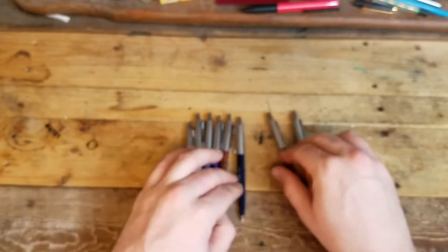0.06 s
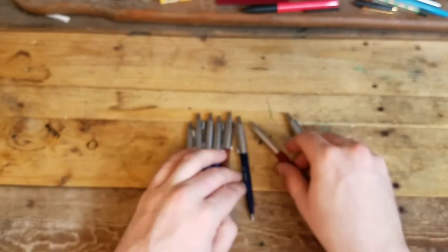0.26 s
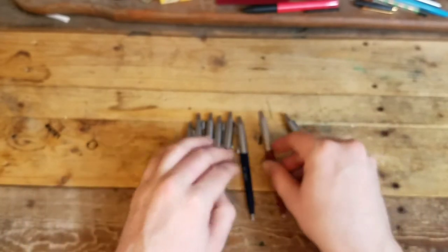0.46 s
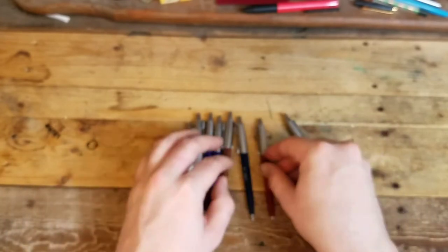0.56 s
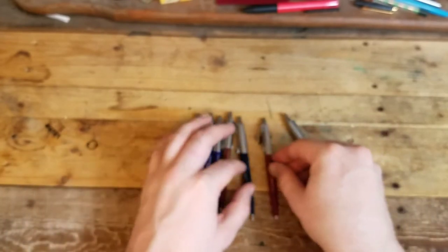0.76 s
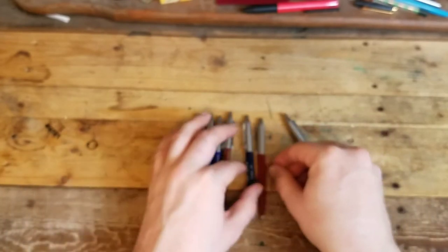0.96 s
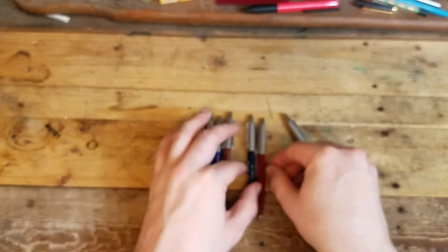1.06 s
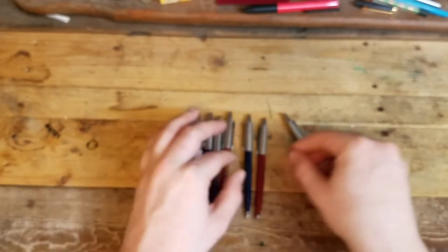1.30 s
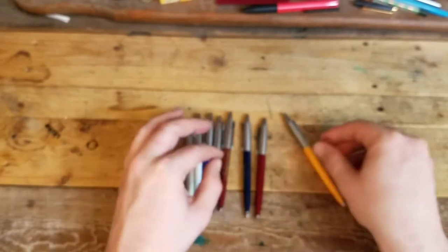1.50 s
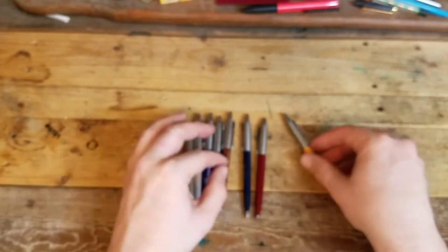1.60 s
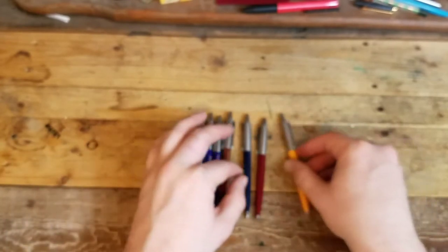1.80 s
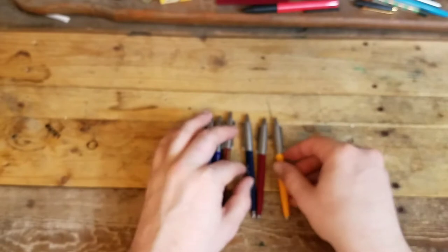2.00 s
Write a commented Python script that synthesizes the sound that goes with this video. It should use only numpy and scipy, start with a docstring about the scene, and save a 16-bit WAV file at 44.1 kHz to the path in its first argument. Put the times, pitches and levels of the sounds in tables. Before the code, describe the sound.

Ballpoint pens are sorted by hand on a wooden table, heard close in a small room. Light taps and a soft slide lead to one sharp knock, then a brief clatter and a few fainter ticks.

```python
"""Light taps and ticks of ballpoint pens, sorted by hand on a wooden table in a small room.
Each impact excites the damped modes of boards and barrel; one pen drops with a sharp knock.
Clips and caps click against each other, and sliding barrels rustle by stick-slip friction.
A low hum and a faint hiss lie underneath."""
import sys
import numpy as np
from scipy import signal
from scipy.io import wavfile

SR = 44100
rng = np.random.default_rng(int(sys.argv[2]) if len(sys.argv) > 2 else 0)


def inscribe(sig):
    """Save sig as 16-bit PCM at rate SR to the path in sys.argv[1].

    A 1-D sig is mono; a 2-D sig holds one channel per row.
    Samples are clipped to [-1, 1] before scaling.
    """
    pcm = np.round(np.clip(np.atleast_2d(sig).T, -1, 1) * 32767)
    wavfile.write(sys.argv[1], SR, pcm.astype(np.int16))


N = 90404
RING_S, BUILD_CYCLES = 0.35, 0.77  # a resonance builds over its cycle, so the lows arrive late
BAND_EDGES_HZ = 25 * 2 ** np.arange(0, 9.6, .5)
BAND_CENTRES_HZ = np.sqrt(BAND_EDGES_HZ[1:] * BAND_EDGES_HZ[:-1])
WOOD_PAN_DB, CLIP_PAN_DB, RUB_PAN_DB = -1.9, -3.4, -0.5

# Impacts of a pen on the table: (time [s], level [dB], contact cutoff [Hz], thud [dB])
PEN_IMPACTS = [(0.057, -52, 1380, 18.5), (0.087, -41, 1190, -10.5), (0.119, -58, 1620, 3),
               (0.188, -41.5, 2520, 8.5), (0.2004, -35, 2310, -1.5), (0.297, -52.5, 1290, 12),
               (0.351, -57, 1900, 25.5), (0.4294, -21.5, 4460, 1.5), (0.9157, -36, 2540, 2),
               (0.939, -45, 1230, 18.5), (0.9900, -32, 2360, -13.5), (0.9990, -37.5, 1410, -10),
               (1.04, -48, 1090, 8), (1.260, -46.5, 2330, 14), (1.2828, -43, 1480, 6.5),
               (1.547, -57, 1250, 14.5), (1.662, -49, 1520, 1), (1.685, -47.5, 1410, 7),
               (1.762, -48, 1470, 9), (1.783, -48.5, 1360, 10), (1.900, -44.5, 1720, 3.5)]
# Modes of the tabletop with a pen on it: (frequency [Hz], level [dB], T60 [s])
TABLETOP_MODES = [(157.3, -18.5, 0.31), (214.4, -24, 0.23), (296, -3.5, 0.072), (447, -13.5, 0.18),
                  (553.2, -10.5, 0.17), (762.7, -10.5, 0.15), (1041, -10, 0.086), (1147.3, -10, 0.18),
                  (1575, -3.5, 0.066), (1997, -11.5, 0.044), (2325, -6.5, 0.12), (2563, -8, 0.12),
                  (4640, 2.5, 0.025)]
# Modes of a hollow barrel against the wood: (frequency [Hz], level [dB], T60 [s])
HOLLOW_BARREL_MODES = [(781, -13.5, 0.079), (902, -16.5, 0.1), (1314, -17.5, 0.079)]
# Dense resonances of boards and barrels: (frequency [Hz], half-octave level [dB])
WOOD_SPECTRUM = [(110, -63), (200, -17.5), (300, -18), (450, -19.5), (800, -6), (1200, -8.5), (1900, -4.5),
                 (2800, -2.5), (4200, -10.5), (15000, -15)]
def pen_taps():
    """Impact excitation: a blow rings tabletop and barrel; soft contact cuts treble, weight adds thud."""
    times, level_db, cutoff_hz, thud_db = np.transpose(PEN_IMPACTS)
    thud_hz, rolloff_order = 360, 8.6

    def blow(hz):
        """Force spectrum of each impact: a bass shelf and a steep low-pass."""
        shelf_db = thud_db / (1 + (hz / thud_hz) ** 2)
        return from_db(level_db + shelf_db) / np.hypot(1, (hz / cutoff_hz) ** rolloff_order)
    boards = dense_modes(WOOD_SPECTRUM, blow, rise_s=np.full(len(times), 98e-6), t60=0.038, room_db=-5.5)
    boards += ringing(TABLETOP_MODES, blow)
    # A loosely held pen thuds less and rings more, decibel for decibel.
    barrel = ringing(HOLLOW_BARREL_MODES, lambda hz: blow(hz) * from_db(-thud_db))
    return pan(WOOD_PAN_DB) * placed(times, boards - barrel)


# Collisions between pens: (time [s], level [dB], contact cutoff [Hz], rise time [s])
CLIP_CONTACTS = [(0.036, -55.5, 10100, 0.0026), (0.057, -52.5, 12000, 0.00033),
                 (0.188, -44.5, 24000, 0.00031), (0.297, -52, 9300, 0.006), (0.3491, -45.5, 5700, 0.00036),
                 (0.392, -44.5, 5660, 0.00035), (0.4293, -29, 8800, 0.00025), (0.935, -35, 12000, 0.0074),
                 (1.001, -49, 8040, 0.00034), (1.02, -57, 8000, .0005), (1.0431, -43, 11100, 0.0038),
                 (1.723, -45.5, 5770, 0.0047), (1.899, -54.5, 7000, 0.0027)]
# Dense resonances of clips and caps: (frequency [Hz], half-octave level [dB])
CLIP_SPECTRUM = [(500, -26.5), (1500, -17), (2800, -17), (4200, -14), (6500, -14.5), (9000, -11),
                 (12000, -3), (15500, -4.5)]
# Modes of a metal cap: (frequency [Hz], level [dB], T60 [s])
METAL_CAP_MODES = [(2410, 0.5, 0.022), (4240, -10.5, 0.031), (4970, -7.5, 0.053)]
def clip_ticks():
    """Free vibration of small parts: clips and caps click; the duller the touch, the more a cap rings."""
    times, level_db, cutoff_hz, rise_s = np.transpose(CLIP_CONTACTS)
    gain = from_db(level_db)
    reference_cutoff_hz = 4930
    clicks = dense_modes(CLIP_SPECTRUM, lambda hz: gain / np.hypot(1, (hz / cutoff_hz) ** 2),
                         rise_s, t60=0.063, room_db=-3)
    caps = ringing(METAL_CAP_MODES, lambda hz: gain * (reference_cutoff_hz / cutoff_hz) ** 2)
    return pan(CLIP_PAN_DB) * placed(times, clicks + caps)


# Pushes of a pen over the wood: (centre time [s], half-width [s], rub level [dB], rustle level [dB])
SLIDE_STROKES = [(0.005, 0.013, -48.5, -69), (0.14, 0.16, -55, -73.5), (0.409, 0.03, -55.5, -77),
                 (0.632, 0.021, -95, -69.5), (0.929, 0.035, -44, -65.5), (1.002, 0.041, -55, -61.5),
                 (1.55, 0.32, -63, -82.5), (1.698, 0.049, -55, -72), (1.81, 0.046, -57, -79),
                 (2.052, 0.044, -49, -73)]
# Friction of barrel on wood: (frequency [Hz], half-octave level [dB])
RUB_SPECTRUM = [(110, -26), (280, -2.5), (450, -13), (800, -6.5), (1200, -8), (2400, -20), (4000, -29.5),
                (9000, -47)]
# Friction of barrel on barrel: (frequency [Hz], half-octave level [dB])
RUSTLE_SPECTRUM = [(1500, -69), (2500, -6), (5000, -6.5), (7000, -5), (13000, -2.5)]
def pen_slides():
    """Stick-slip friction: tiny random slips excite the wood, the neighbouring barrels and a cap."""
    t = np.arange(N) / SR
    centre_s, half_width_s, rub_db, rustle_db = np.transpose(SLIDE_STROKES)
    strokes = np.exp(-((t - centre_s[:, None]) / half_width_s[:, None]) ** 2)
    slips_per_s, scatter_db, cap_db = 2200, 3, -14
    slips = (rng.random(N) < slips_per_s / SR) * from_db(scatter_db * rng.standard_normal(N))
    friction = slips * rng.standard_normal((2, 2, N)) + 1e-18
    cap_hz, _, cap_t60 = METAL_CAP_MODES[0]
    radius = decay(1 / SR, cap_t60)
    resonator = [1, -2 * radius * np.cos(2 * np.pi * cap_hz / SR), radius * radius]
    cap = signal.lfilter([1, 0, -1], resonator, friction[0])
    rub = coloured(RUB_SPECTRUM, friction) + from_db(cap_db) * cap / cap.std()
    rustle = coloured(RUSTLE_SPECTRUM, friction)
    return (pan(RUB_PAN_DB) * (from_db(rub_db) @ strokes) * rub
            + pan(CLIP_PAN_DB) * (from_db(rustle_db) @ strokes) * rustle)


def ringing(modes, excitation):
    """Modal superposition: damped sines of alternating sign, out of step between left and right."""
    t, out = np.arange(int(RING_S * SR)) / SR, 0
    for k, (hz, level_db, t60) in enumerate(modes):
        spread_rad = 0.83 * (1 - at_hz(STEREO_COHERENCE, hz))
        phase = spread_rad * rng.choice([-1, 1]) * np.array([[1], [-1]])
        attack = np.minimum(t * hz / BUILD_CYCLES, 1)
        ring = np.sin(2 * np.pi * hz * t + phase) * decay(t, t60) * attack
        out = out + (-1) ** (k + 1) * from_db(level_db) * excitation(hz)[:, None, None] * ring
    return out


# Reverberation of the small room: (frequency [Hz], T60 [s])
ROOM_DECAY = [(120, 0.43), (320, 0.25), (700, 0.27), (1400, 0.21), (2600, 0.25), (4500, 0.21),
              (14000, 0.17)]
def dense_modes(spectrum, excitation, rise_s, t60, room_db):
    """Modal overlap: crowded resonances act as decaying noise, with a first crack and a room tail."""
    t, out = np.arange(int(RING_S * SR)) / SR, 0
    white = rng.standard_normal((len(rise_s), 2, 2, len(t)))
    rise = np.maximum(rise_s, 1 / SR)[:, None, None]
    since_rise = np.maximum(t - rise, 0)
    crack = from_db(6.5) * decay(since_rise, t60=0.014)
    direct = decay(since_rise, t60) + crack
    for k, hz in enumerate(BAND_CENTRES_HZ):
        if hz > 100:
            attack = np.minimum(t / (rise + BUILD_CYCLES / hz), 1)
            tail = from_db(room_db) * decay(t, at_hz(ROOM_DECAY, hz))
            burst = stereo_band(white[:, k % 2] * attack * (direct + tail), k)
            rms = np.sqrt((burst ** 2).sum(axis=2, keepdims=True) / (.01 * SR))  # energy over 10 ms
            out = out + burst / rms * from_db(at_hz(spectrum, hz)) * excitation(hz)[:, None, None]
    return out


# Likeness of left and right: (frequency [Hz], correlation [1])
STEREO_COHERENCE = [(60, 0.92), (300, 0.89), (700, 0.55), (1400, 0.13), (3000, 0.077), (14000, 0.061)]
def stereo_band(pair, k):
    """Partial coherence: sum and difference of two independent signals, in half-octave band k."""
    coherence = np.clip(at_hz(STEREO_COHERENCE, BAND_CENTRES_HZ[k]), -.99, .99)
    blend = np.sqrt([[1 + coherence, 1 - coherence]] * 2) * [[1, 1], [1, -1.02]]
    bandpass = signal.butter(2, BAND_EDGES_HZ[k:k + 2], "band", fs=SR, output="sos")
    return signal.sosfilt(bandpass, blend @ pair)


def coloured(spectrum, source):
    """Spectral shaping: each band gets its level; adjacent bands draw on independent noise pairs."""
    bands = (stereo_band(source[k % 2], k) for k in range(len(BAND_CENTRES_HZ)))
    return sum(from_db(at_hz(spectrum, hz)) * band / band.std() for hz, band in zip(BAND_CENTRES_HZ, bands))


def placed(times, sounds):
    """Linear superposition: each sound adds in at its onset time."""
    out = np.zeros((2, N + SR))
    for onset_s, sound in zip(times, sounds):
        start = max(int(onset_s * SR), 0)
        out[:, start:start + sound.shape[1]] += sound
    return out[:, :N]


def from_db(db):
    """Amplitude ratio of a level in decibels."""
    return 10 ** (np.asarray(db) / 20)


def at_hz(points, hz):
    """Linear interpolation along log frequency."""
    frequencies, values = np.transpose(points)
    return np.interp(np.log(hz), np.log(frequencies), values)


def decay(t, t60):
    """Exponential damping: 60 dB down at t60."""
    return np.exp(-np.log(1000) * t / t60)


def pan(db):
    """Intensity panning: gains that put the left db above the right."""
    return from_db(np.array([[db], [-db]]) / 2)


# Room noise and hiss: (frequency [Hz], half-octave level [dB])
NOISE_SPECTRUM = [(30, -105), (50, -71), (80, -63), (130, -73.5), (280, -70.5), (600, -76), (1200, -74.5),
                  (2500, -74.5), (7000, -82.5), (11000, -80), (15000, -72.5)]
# Low hum: (frequency [Hz], level [dB])
HUM_TONES = [(45, -64.5), (67.5, -67)]
def background():
    """Broadband noise under two low tones that waver by slow amplitude and phase modulation."""
    t, knots = np.arange(N) / SR, np.linspace(0, N / SR, num=16)
    out = coloured(NOISE_SPECTRUM, rng.standard_normal((2, 2, N)))
    waver = 0.78
    for hz, db in HUM_TONES:
        swell, drift = (np.interp(t, knots, waver * rng.standard_normal(len(knots))) for _ in range(2))
        out = out + np.sqrt(2) * from_db(db) * (1 + swell) * np.sin(2 * np.pi * hz * t + 2 * drift)
    return out


def scene():
    """Sound pressures add: pens and table over the quiet room."""
    return pen_taps() + clip_ticks() + pen_slides() + background()


def record(dry):
    """Band limiting: a steep elliptic low-pass cuts the treble above 16.3 kHz."""
    return signal.sosfilt(signal.ellip(10, .2, 70, 16300, fs=SR, output="sos"), dry)


dry = scene()
out = record(dry)
inscribe(out)
```